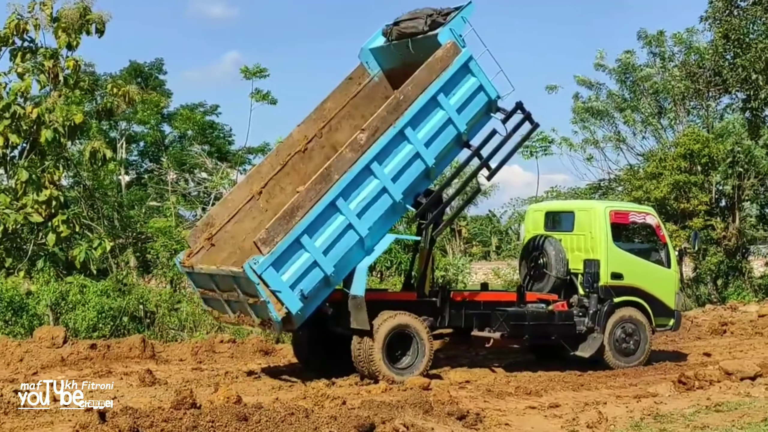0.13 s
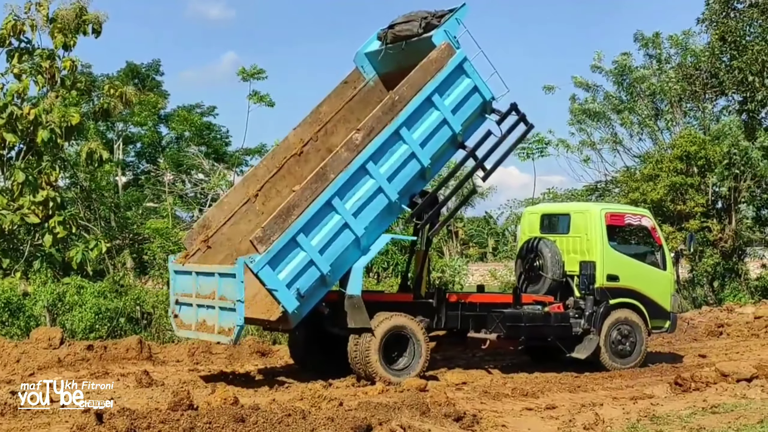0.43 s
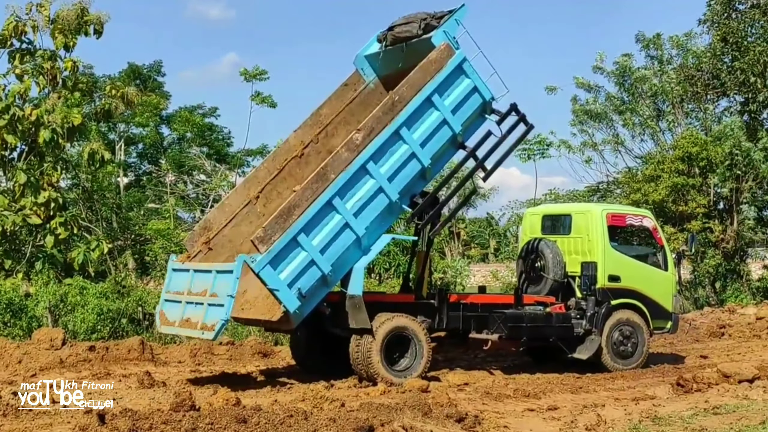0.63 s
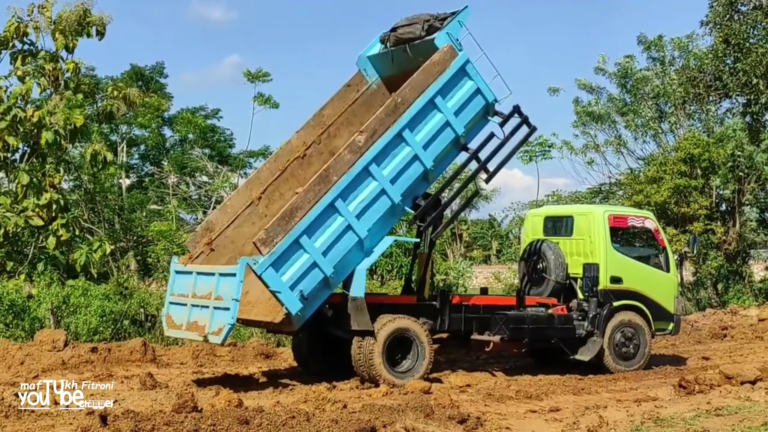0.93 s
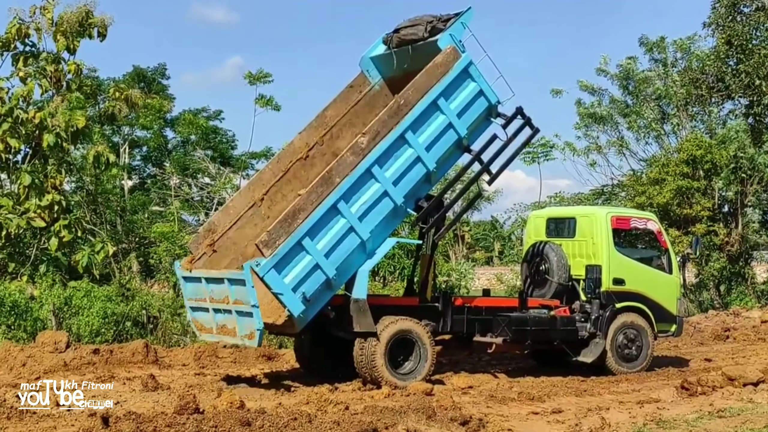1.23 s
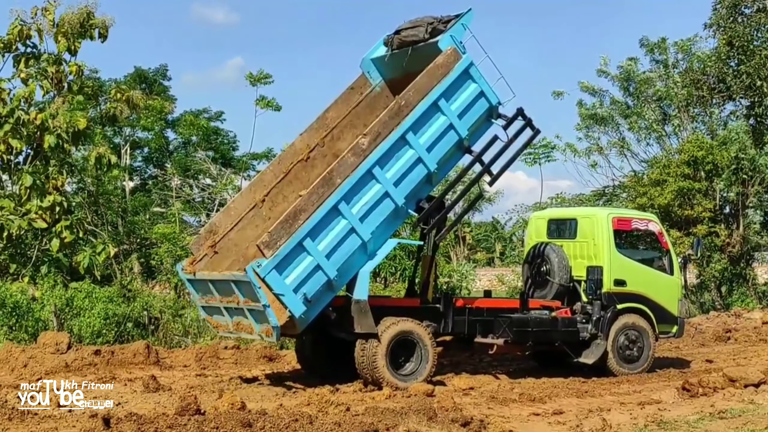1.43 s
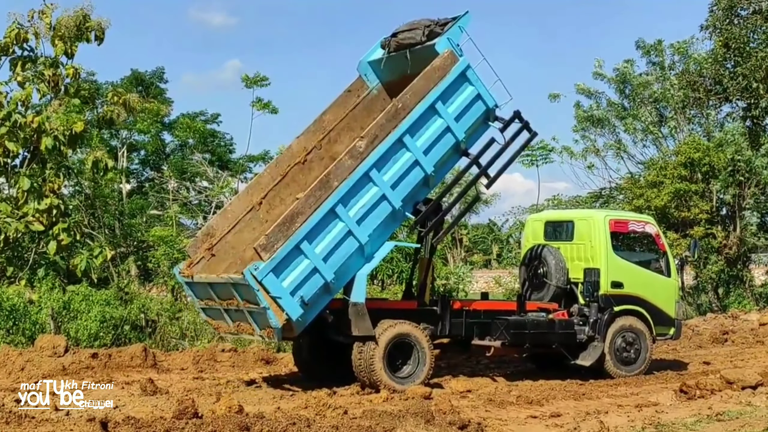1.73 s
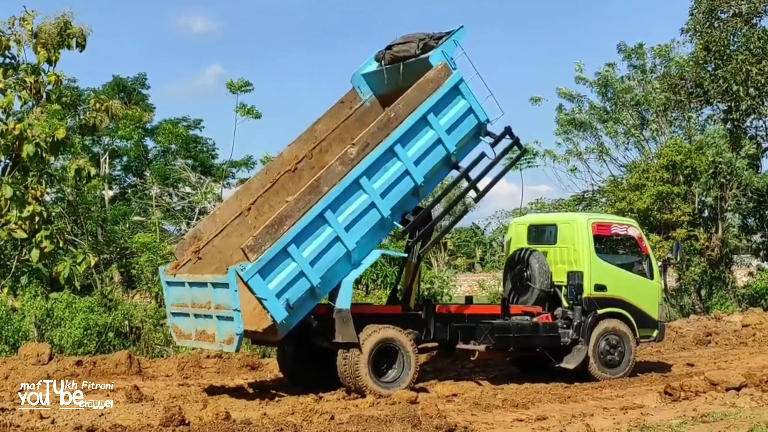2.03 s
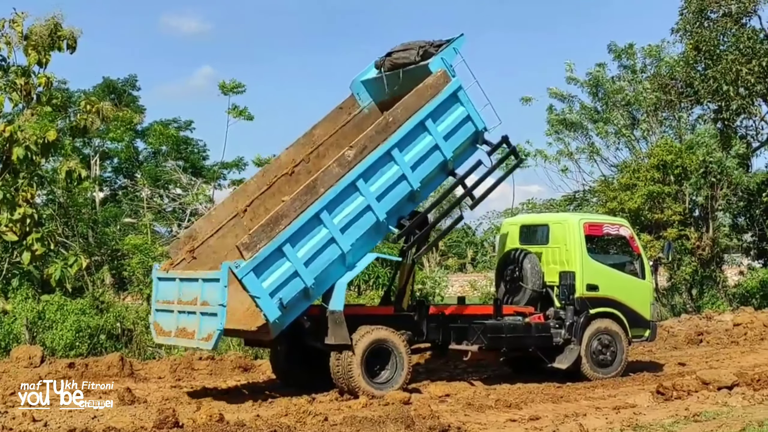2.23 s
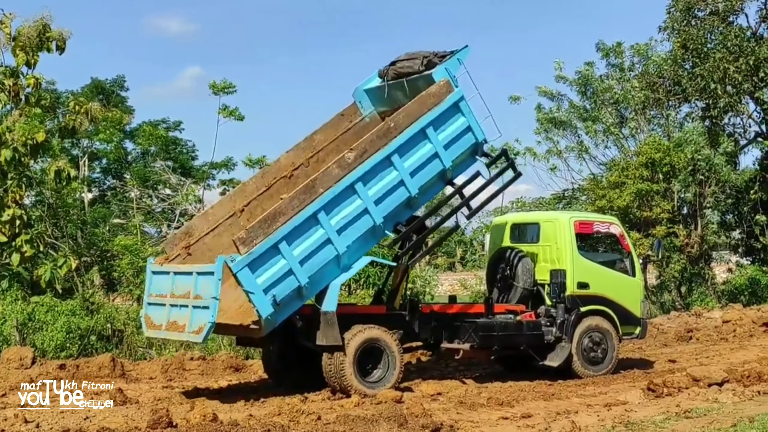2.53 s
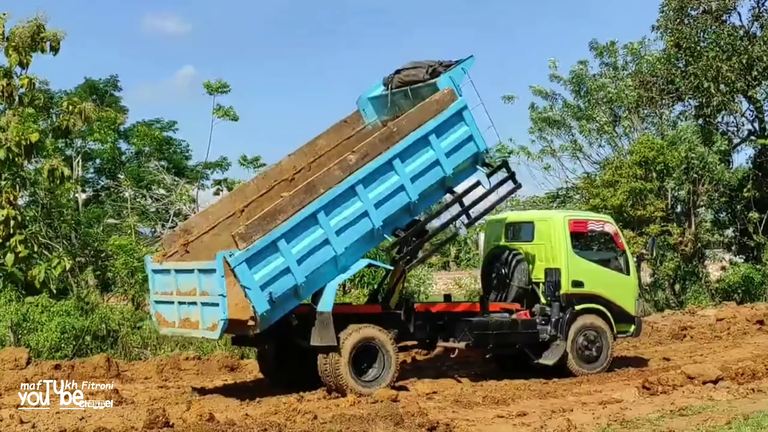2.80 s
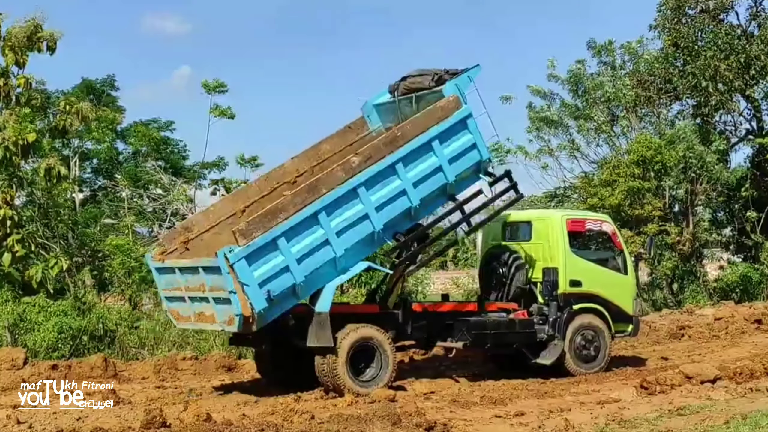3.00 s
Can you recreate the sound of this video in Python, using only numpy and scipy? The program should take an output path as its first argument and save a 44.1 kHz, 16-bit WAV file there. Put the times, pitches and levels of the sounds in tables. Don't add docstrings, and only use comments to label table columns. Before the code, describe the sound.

A diesel truck engine idles throughout, about 25 hard metallic knocks per second easing to 21, uneven between cylinders, with ringing clatter. At 0.2 s the steel tailgate bangs, rebounds rapidly until 0.35 s with bright latch ticks, another at 0.38 s, and bumps lightly at 0.56 s. A low drone hums, fading mid-way. Dull chassis thumps come at 2.6 and 2.8 s; faint air hiss swells from 2.7 s. Open outdoors, no echo.

```python
import sys
import numpy as np
from scipy import signal
from scipy.fft import rfft, irfft
from scipy.io import wavfile
from scipy.ndimage import uniform_filter1d

SR = 44100
rng = np.random.default_rng(int(sys.argv[2]) if len(sys.argv) > 2 else 0)


def makeup_ratio(level_db):
    decades = np.asarray(level_db, float) / 20
    return 10 ** decades


def transcribe(signal):
    frames = np.atleast_2d(signal).T
    limited = np.clip(frames, -1, 1)
    pcm = np.round(limited * 32767).astype(np.int16)
    wavfile.write(sys.argv[1], SR, pcm)


N = 139356
T = np.arange(N) / SR

# frequency in Hz, density in dB per Hz.
SITE_SPECTRUM = [(20, 1.5), (65, 0.5), (300, -18), (900, -16.5), (1750, -13.5), (4300, -31.5),
                 (7000, -24.5), (13000, -30.5)]
SITE_DB = -34.5
AIR_START_S, AIR_RISE_S, AIR_DB, AIR_HZ, AIR_WIDTH_HZ = 2.7, 0.23, -39, 8900, 9100

# time in seconds, pitch in Hz, level in dB rms.
DRONE_LEVEL = [(0.0, 50.4, -27.5), (0.29, 48.0, -23), (0.33, 51.6, -18), (0.38, 52.5, -28), (0.41, 52, -23),
               (0.54, 55.5, -22.5), (1.61, 54.5, -28.5), (1.83, 54.04, -28.5), (1.92, 51.5, -40),
               (1.94, 51.8, -29.5), (2.19, 51.75, -32.5), (2.55, 53.5, -34.5), (2.62, 53.3, -32),
               (3.05, 46.2, -26.5), (3.09, 45.2, -33), (3.16, 43.5, -23.5)]
# time in seconds, pitch in Hz.
DRONE_PITCH = [(0, 49.2), (.27, 48), (.42, 53.4), (.55, 54.5), (1.7, 54.4), (1.93, 51.9), (2.22, 51.8),
               (2.53, 53.5), (2.89, 49), (3.16, 45)]
# time in seconds, pitch in Hz, level in dB rms.
HUM = [(0, 139, -39), (.5, 139, -36.5), (0.962, 133.6, -39.5), (1.62, 132.7, -39.5), (2.4, 138.2, -46),
       (2.6, 140, -51)]
# frequency in Hz, width in Hz, level in dB.
PANELS = [(68.7, 3.1, -40), (103.1, 7.5, -45.5), (152, 10, -40.5), (208.5, 34, -42), (364, 3.7, -62)]
# time in seconds, level in dB rms.
BED_LEVEL = [(0.4, -39.5), (0.57, -48), (0.98, -41.5), (1.04, -44.5), (1.12, -41), (1.24, -49), (1.58, -43),
             (2.1, -48.5), (2.12, -38), (2.93, -43.5), (2.97, -38), (3.16, -45)]
BED_HZ, BED_WIDTH_HZ = 294.4, 4.2

# start in seconds, level in dB, low modes' share in dB.
BLOWS = [
    (0.221, -21, -18),
    (0.248, -28.5, 3.5),
    (0.275, -32, 4),
    (0.297, -38, 4),
    (0.323, -39, -1.5),
    (0.353, -48, 12),
    (0.559, -41.5, -4),
    (2.772, -42, -4),
    (2.801, -45.5, 5),
]
# frequency in Hz, t60 in seconds, level in dB.
GATE_HIGH = [(490, .15, -2), (538, .3, 1), (585, .15, -6), (721, .15, -9), (818, .2, -2), (868, .2, -5),
             (926, .22, -3), (1040, .08, -7), (1281, .1, -5), (1351, .15, -5), (1427, .12, -5),
             (1583, .1, -9)]
GATE_LOW = [(48, .4, -6), (120, .25, -1), (138, .35, 3), (185, .3, -9), (250, .2, -10), (289, .45, -3),
            (366, .35, -2)]
# frequency in Hz, decay in seconds, level in dB.
CRASH = [(150, .045, -8), (300, .03, -12), (520, .02, -8), (1150, .013, -6), (1900, .008, -19),
         (4000, .016, -13), (6800, .012, -23)]
# start in seconds, level in dB, frequency in Hz,
# t60 in seconds.
TICKS = [
    (.218, -28, 6500, 0.017),
    (0.241, -25, 8670, 0.039),
    (0.25, -23.5, 8245, 0.083),
    (0.378, -27, 8200, 0.02),
    (0.3776, -30, 7600, .014),
    (.377, -41, 7100, .014),
    (2.595, -22, 148.5, 0.11),
    (2.795, -24.5, 153, 0.22),
    (2.97, -38, 152, 0.75),
]
STRIKE_DB, RATTLE_DB, RATTLE_S, SOFT_HZ = 25, -1, .016, 1900

# time in seconds, firings per second.
FIRING = [(0, 25.625), (.5, 23.307), (1, 22.878), (1.6, 22.219), (2.1, 21.318), (2.6, 21.05),
          (3.16, 21.856)]
FIRST_TURN = -.28
# frequency in Hz, width in Hz, level in dB.
SUMP = (-3, -7, -7, 0), [(425, 45, -44), (540, 35, -49), (800, 200, -53)]
BLOCK = (-4, -1, -1, 0), [(1230, 40, -56), (1283, 27, -54), (1356, 18, -50)]
HEAD = (0, 0, -5, -1), [(1725, 16, -51), (1805, 30, -53), (1945, 16, -56)]
COVERS = (-0.5, 0.5, -6.5, -0.5), [(2085, 5.4, -54), (2125, 48, -49), (2338, 10, -49.5), (2552, 260, -45.5),
          (2910, 160, -58)]
INJECTORS = (-.5, -1.1, 0, -0.42), [(5170, 660, -56.5), (6970, 880, -45), (7600, 1000, -54.5),
             (9350, 830, -53.5)]
# lead, rise and decay in seconds, steady shake in dB, tap in dB.
KNOCKS = [
    (.002, .002, .012, -7, -8),
    (.0004, .0004, .006, -4, -12),
    (.002, .001, .010, -4, -12),
    (.003, .002, .011, -12, -12),
    (.003, .0025, .011, -10, -24),
]
SCATTER_DB, SHARED_DB, FLUTTER_DB = .7, .6, .8
SPREAD_S, PORT_LAG_S = .0012, .00007
# cylinder, delay in seconds, frequency in Hz, t60 in seconds, level in dB,
# gain in dB per second.
RINGS = [(0, .0, 1290, 0.069, -38, 4.5), (0, .0, 1280, 0.12, -40, -1), (0, -.002, 1823, 0.084, -31.5, 1.5),
         (0, .007, 1820, 0.11, -28.5, -2.5), (0, .004, 2217, 0.066, -40, 1.5),
         (0, .004, 2330, 0.092, -40.5, 0.5), (0, .004, 2497, 0.047, -42, 4),
         (0, .005, 403, 0.027, -49, 5.5), (1, .0, 1337, 0.071, -29, 0.5), (1, .0, 1280, 0.046, -32, 2),
         (1, .001, 1742, 0.2, -28, -2.5), (1, .001, 1890, 0.18, -34.5, -0.5),
         (1, .007, 2075, 0.094, -43.5, 1.5), (1, .007, 2840, 0.024, -57, 11.5),
         (1, .003, 432, 0.11, -47, 5), (2, .0, 1290, 0.093, -33, 2.5), (2, .0, 1336, 0.3, -37, 0),
         (2, .0, 1730, 0.049, -39.5, 2), (2, .008, 1800, 0.045, -34, 1.5), (2, -.002, 447, 0.084, -40, 5),
         (3, .0, 1274, 0.059, -26.5, 0), (3, .0, 1347, 0.08, -23.5, -0.5), (3, .002, 1483, 0.065, -45, 3),
         (3, .003, 1730, 0.056, -45, 4), (3, .006, 1754, 0.13, -27, -2.5),
         (3, -.001, 2054, 0.092, -41.5, 2.5), (3, .008, 2295, 0.022, -36.5, 1),
         (3, .0, 407, 0.24, -57.5, 3)]
RING_RISE_S, RING_SCATTER_DB, RING_DETUNE, RING_LAG_S = .0004, 1.2, .003, .00003
# multiple of the firing rate, level in dB rms.
EXHAUST = [(1, -48), (2, -39), (3, -45), (4, -49.5), (7, -42.5), (8, -43.5), (10, -58), (13, -56.5)]

# frequency in Hz, correlation from -1 to 1.
LIKENESS = [(100, 0.97), (450, 1), (800, 0.68), (1150, 0.7), (1800, 0.5), (2500, 0.51), (3200, -.2),
            (6500, -.2), (10000, 0.13)]
# frequency in Hz, left minus right in dB.
PORTS = [(200, 4.5), (1000, 4), (1700, 8), (3500, -3.5), (5600, -1), (6750, -19), (8500, 13.5), (10500, 4)]
# frequency in Hz, gain in dB.
TREBLE = [(8000, -0.5), (9500, -10), (10400, -17), (11400, -25.5), (12300, -9.5), (12900, -10.5),
          (13300, -49)]


def curve(table, at, col=1, log=False):
    rows = np.array(table, float)
    if log:
        return np.interp(np.log(at + 1), np.log(rows[:, 0] + 1), rows[:, col])
    return np.interp(at, rows[:, 0], rows[:, col])


def colour(x, gain):
    return irfft(rfft(x) * gain(np.arange(N // 2 + 1) * SR / N), N)


def noise():
    def like(hz):
        return np.clip(curve(LIKENESS, hz, log=True), -.99, 1)

    mid, side = rng.standard_normal((2, N))
    mid = colour(mid, lambda hz: np.sqrt((1 + like(hz)) / 2))
    side = colour(side, lambda hz: np.sqrt((1 - like(hz)) / 2))
    return np.array([mid + side, mid - side])


def ring(x, hz, width_hz):
    r = np.exp(-np.pi * width_hz / SR)
    poles = [1, -2 * r * np.cos(2 * np.pi * hz / SR), r * r]
    return signal.lfilter([1, 0, -1], poles, x) * np.sqrt((1 - r * r) / 2)


def walk(rate_hz):
    k = int(SR / rate_hz)
    w = uniform_filter1d(uniform_filter1d(rng.standard_normal(N), k), k)
    return (w - w.mean()) / w.std()


def burst(at_s, decay_s, rise_s):
    age_s = np.maximum(T - at_s, 0)
    return (1 - np.exp(-age_s / rise_s)) * np.exp(-age_s / decay_s)


def open_air():
    wash = 0
    for centre_hz in 25 * 2. ** np.arange(10):
        def band_gain(hz):
            octaves = np.clip(np.log2((hz + 1) / centre_hz), -1, 1)
            return makeup_ratio(curve(SITE_SPECTRUM, hz, log=True)) * np.cos(np.pi / 2 * octaves)

        wash = wash + colour(noise(), band_gain) * makeup_ratio(walk(8.8))
    return wash * makeup_ratio(SITE_DB) / wash.std()


def air_hiss():
    swell = np.clip((T - AIR_START_S) / AIR_RISE_S, 0, 1)
    return makeup_ratio(AIR_DB) * swell * ring(noise(), AIR_HZ, AIR_WIDTH_HZ)


def second_machine():
    shake = noise()
    out = makeup_ratio(curve(BED_LEVEL, T)) * ring(shake, BED_HZ, BED_WIDTH_HZ)
    for hz, width_hz, db in PANELS:
        out = out + makeup_ratio(db + 1.9 * walk(6.4)) * ring(shake, hz, width_hz)
    for level, pitch in ((DRONE_LEVEL, DRONE_PITCH), (HUM, HUM)):
        tone = np.sin(2 * np.pi * np.cumsum(curve(pitch, T)) / SR)
        out = out + np.sqrt(2) * makeup_ratio(curve(level, T, col=2)) * tone
    return out


def gate_sheet():
    high, low, out = 0, 0, 0
    for at_s, db, low_db in BLOWS:
        strike = makeup_ratio(STRIKE_DB) * (np.arange(N) == int(at_s * SR))
        push = strike + makeup_ratio(RATTLE_DB) * burst(at_s, RATTLE_S, 0.0012)
        high = high + makeup_ratio(db) * push
        low = low + makeup_ratio(db + low_db) * push
    for push, modes in ((high, GATE_HIGH), (low, GATE_LOW)):
        is_strike = push > 4 * np.roll(push, 1)
        shake = push * np.where(is_strike, 1, noise()[0])
        shake = signal.lfilter(*signal.butter(2, SOFT_HZ, fs=SR), shake)
        for hz, t60_s, db in modes:
            out = out + makeup_ratio(db) * ring(shake, hz, np.log(1000) / np.pi / t60_s)
    return out


def gate_crash():
    grit, out = noise(), 0
    for hz, decay_s, crash_db in CRASH:
        push = 0
        for at_s, db, low_db in BLOWS:
            push = push + makeup_ratio(db + low_db * (hz < 400)) * burst(at_s, decay_s, 0.0028)
        out = out + makeup_ratio(crash_db) * push * ring(ring(grit, hz, hz), hz, hz)
    return out


def latch_and_thumps():
    port_lag_s = np.array([[0], [.00002]])
    out = 0
    for at_s, db, hz, t60_s in TICKS:
        envelope = makeup_ratio(db) * burst(at_s, t60_s / np.log(1000), 2 / hz)
        out = out + envelope * np.sin(2 * np.pi * hz * (T + port_lag_s))
    return out


def exhaust(turn):
    out = 0
    for order, db in EXHAUST:
        level = makeup_ratio(db - 0.5 + 1.23 * walk(7.5))
        out = out + level * np.sin(2 * np.pi * (order * turn + rng.random()))
    return out


def cylinder_rings(turn):
    out = np.zeros((2, N + 5000))
    age_s = np.arange(3200) / SR
    k = (turn + 4).astype(int)
    fired = np.flatnonzero(np.diff(k)) + 1
    half = np.array([[.5], [-.5]])
    for cylinder, late_s, hz, t60_s, db, gain_db_per_s in RINGS:
        chance = rng.standard_normal((len(fired), 3))
        for i, (size, tune, lag) in zip(fired, chance):
            if k[i] % 4 != cylinder:
                continue
            start = max(i + int(late_s * SR), 0)
            level_db = db + gain_db_per_s * i / SR + RING_SCATTER_DB * size - 60 * age_s / t60_s
            shape = makeup_ratio(level_db) * (1 - np.exp(-age_s / RING_RISE_S))
            tuned_hz = hz * (1 + RING_DETUNE * tune)
            tone = np.sin(2 * np.pi * tuned_hz * (age_s + RING_LAG_S * lag * half))
            out[:, start:start + len(age_s)] += shape * tone
    return out[:, :N]


def knock(turn, rate, part, envelope, shared_db):
    cylinders_db, modes = part
    lead_s, rise_s, decay_s, steady_db, tap_db = envelope
    at = turn + lead_s * rate + 4
    k, age_s = at.astype(int), at % 1 / rate
    firing_db = shared_db + SCATTER_DB * rng.standard_normal(100)
    size = makeup_ratio(np.array(cylinders_db)[k % 4] + firing_db[k])
    pulse = size * (1 - np.exp(-age_s / rise_s)) * np.exp(-(age_s / decay_s) ** 2)
    push = pulse + makeup_ratio(steady_db + FLUTTER_DB * walk(30))
    shake = noise() * push / np.sqrt(np.mean(push ** 2))
    fired = np.flatnonzero(np.diff(k)) + 1
    out = 0
    for hz, width_hz, db in modes:
        port_lag_s = PORT_LAG_S * np.abs(rng.standard_normal((2, len(fired))))
        late_s = SPREAD_S * rng.random(len(fired)) + port_lag_s
        tap_at = np.minimum(fired + (late_s * SR).astype(int), N - 1)
        taps = np.zeros((2, N))
        taps[[[0], [1]], tap_at] = size[fired] * np.sqrt(N / len(fired))
        out = out + makeup_ratio(db) * ring(shake + makeup_ratio(tap_db) * taps, hz, width_hz)
    return out


def engine():
    rate = curve(FIRING, T)
    turn = FIRST_TURN + np.cumsum(rate) / SR
    shared_db = SHARED_DB * rng.standard_normal(100)
    out = cylinder_rings(turn) + exhaust(turn)
    for part, envelope in zip((SUMP, BLOCK, HEAD, COVERS, INJECTORS), KNOCKS):
        out = out + knock(turn, rate, part, envelope, shared_db)
    return out


def scene():
    gate_and_thumps = gate_sheet() + gate_crash() + latch_and_thumps()
    return open_air() + air_hiss() + second_machine() + gate_and_thumps + engine()


def roll_off(x):
    return signal.sosfilt(signal.butter(12, 13620, fs=SR, output="sos"), x)


def record(dry):
    def ratio(hz):
        return makeup_ratio(curve(PORTS, hz, log=True))

    def right(hz):
        return 2 / (1 + ratio(hz)) * makeup_ratio(curve(TREBLE, hz, log=True))

    left_port = colour(dry[0], lambda hz: ratio(hz) * right(hz))
    right_port = colour(dry[1], right)
    return roll_off(np.array([left_port, right_port]))


dry = scene()
out = record(dry)
transcribe(out)
```